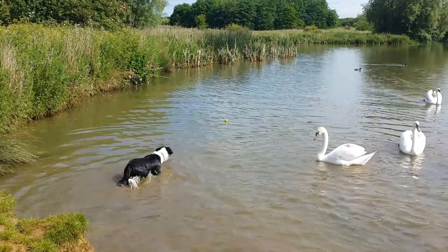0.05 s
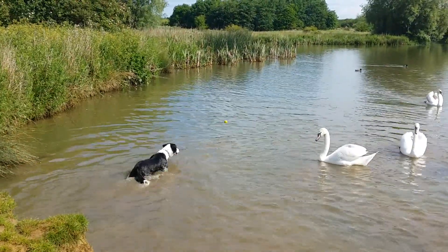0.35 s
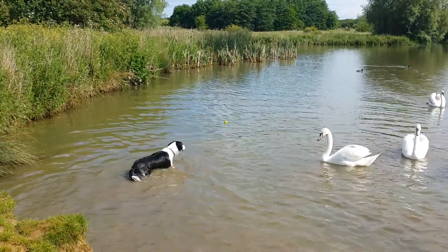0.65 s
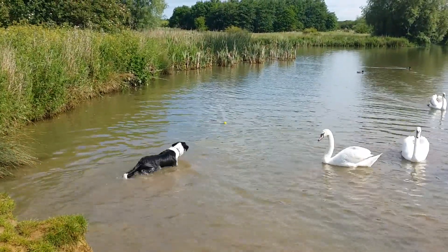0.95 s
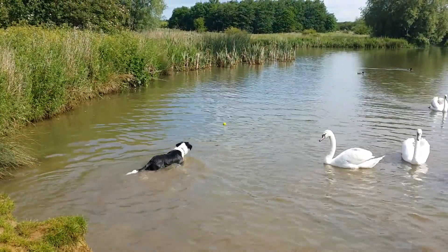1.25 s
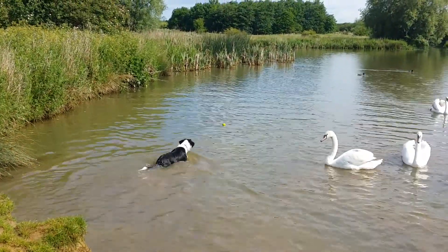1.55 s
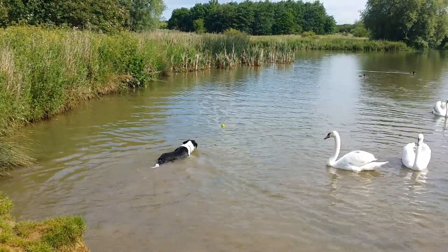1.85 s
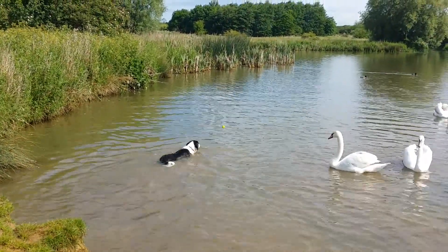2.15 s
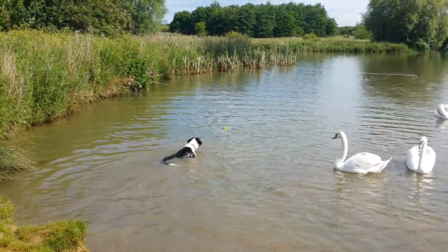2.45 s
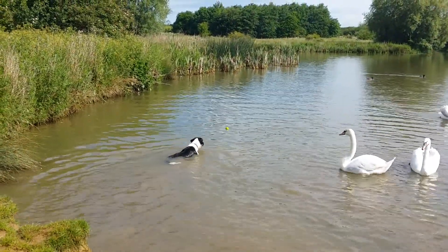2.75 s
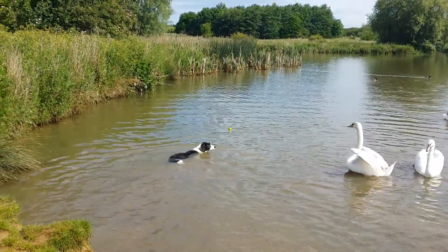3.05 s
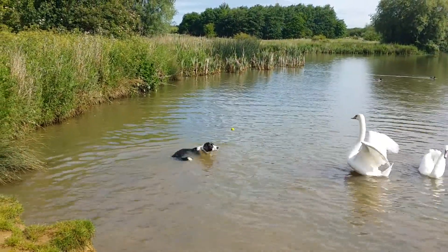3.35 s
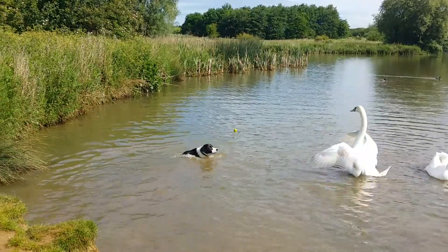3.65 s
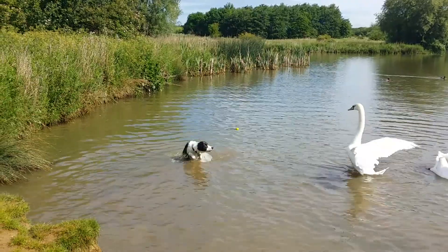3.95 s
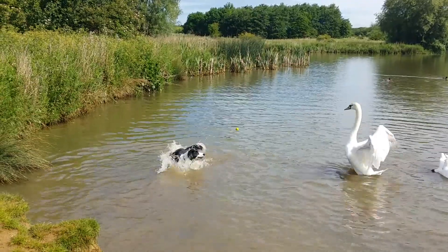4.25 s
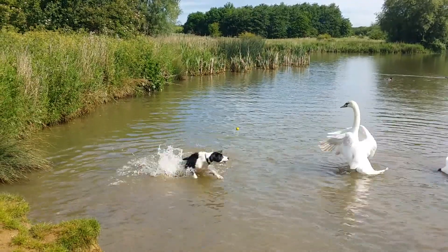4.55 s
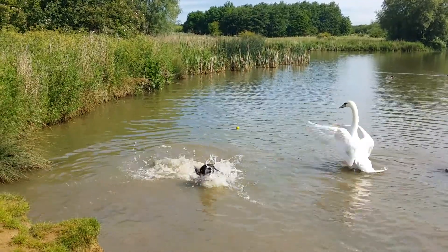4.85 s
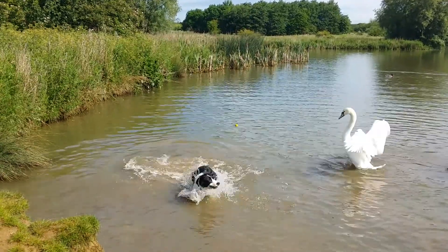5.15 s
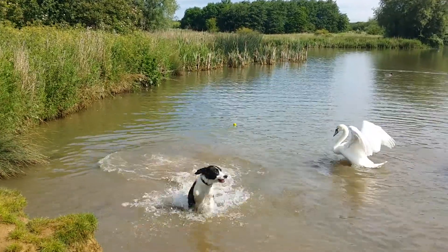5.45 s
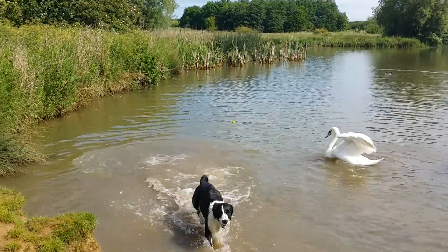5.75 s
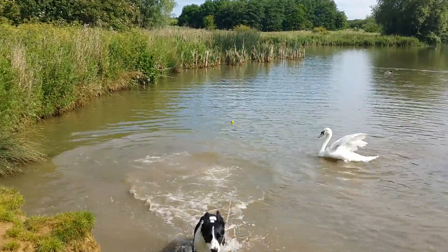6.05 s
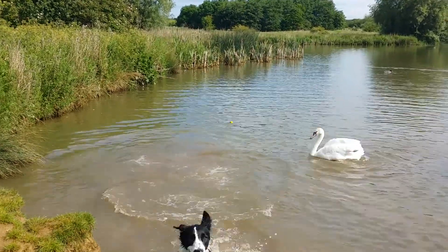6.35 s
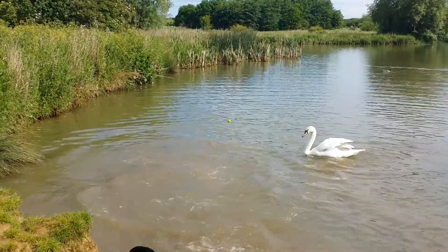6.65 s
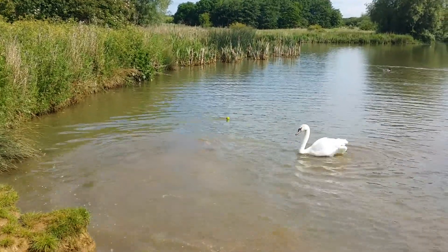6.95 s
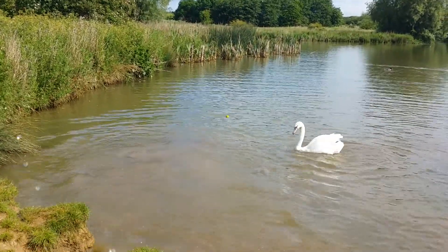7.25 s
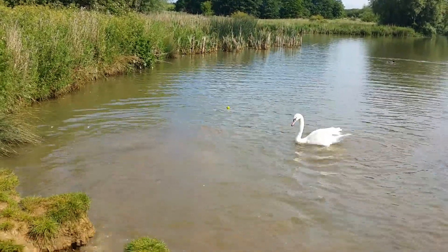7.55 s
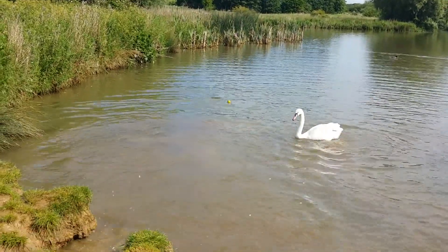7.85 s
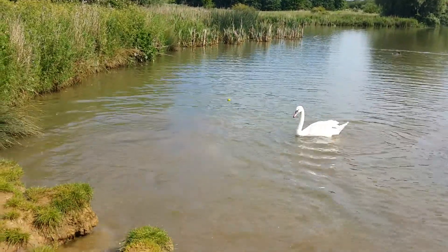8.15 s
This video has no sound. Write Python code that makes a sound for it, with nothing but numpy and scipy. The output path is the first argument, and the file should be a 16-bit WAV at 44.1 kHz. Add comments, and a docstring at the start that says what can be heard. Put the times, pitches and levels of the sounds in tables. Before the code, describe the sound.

A dog wades into a pond with soft sloshes, bubbles and drips, while a warbler trills in the reeds and another bird flutes far off. The dog gives two short woofs and bounds back through the shallows in loud, uneven splashes. Close to the microphone it shakes itself twice, wet ears slapping, drops ticking and its collar tag clinking. Faint country air and light puffs of wind lie underneath.

```python
"""A dog wades into a pond, all slosh, bubbles and drips, while a warbler trills in the reeds and another
bird flutes far off. At 3.5 s the dog woofs, rough pulses through throat and muzzle; it wheels round,
woofs again and bounds back through the shallows, each paw thumping trapped air and throwing spray.
From 6.7 s it shakes itself twice on the bank, close by: wet ears slap, flung drops tick as they land
and the tag on its collar clinks and rings. Country air and puffs of wind lie under it all."""
import sys
import numpy as np
from scipy import signal
from scipy.fft import rfft, irfft, next_fast_len
from scipy.io import wavfile

SR = 44100
rng = np.random.default_rng(int(sys.argv[2]) if len(sys.argv) > 2 else 0)


def wav_out(sig):
    """Save sig, one row per channel (or a flat mono array), as 16-bit PCM at SR to the path in sys.argv[1]."""
    wavfile.write(sys.argv[1], SR, np.round(np.clip(np.atleast_2d(sig).T, -1, 1) * 32767).astype(np.int16))


N = 369999
TIME = np.arange(N) / SR

# Levels in the tables are pre-fader: each layer adds its own gain.
# tone of the far country air: (frequency [Hz], level [dB])
AIR_TONE = [(30, 13), (90, -11), (150, 2), (230, -3.5), (330, -14), (600, -14.5), (1200, -17.5),
            (1900, -16.5), (2350, -9.5), (3100, -14.5), (4600, -24), (8600, -26.5), (14000, -35.5)]
# a thin far hiss in the reeds: (time [s], hold [s], level [dB])
REED_HISSES = [(.45, 0.21, -64.5)]
# puffs of wind on the microphone: (time [s], hold [s], level [dB])
GUSTS = [(0.0, 0.036, -58), (4.28, 0.16, -53.5), (4.95, 0.067, -52.5), (6.1, 0.24, -58),
         (6.52, 0.14, -50.5), (7.15, 0.026, -57), (7.6, .25, -65.5), (8.2, 0.1, -56.5)]
# their rumble: (frequency [Hz], level [dB])
WIND_TONE = [(10, -35), (25, -35), (60, -6), (110, -4.5), (200, -23), (1000, -75)]
# echoes off the reed banks: (delay [s], level [dB])
BANK_ECHOES = [(0.032, -25), (0.076, -25), (.118, -66)]
# the far bird's fluting: (time [s], length [s], start [Hz], middle [Hz], end [Hz], level [dB])
FLUTE_NOTES = [(.635, .05, 2400, 2430, 2200, -66), (.665, .06, 2360, 2580, 2500, -70),
               (.98, 0.045, 2150, 2210, 2350, -70), (1.53, .11, 1850, 1940, 1820, -71),
               (1.66, .08, 1940, 2000, 1950, -69), (1.785, 0.069, 1775, 1820, 1740, -63),
               (1.937, 0.096, 2970, 2520, 2070, -64), (2.078, 0.065, 2070, 2010, 1930, -61),
               (2.36, 0.063, 1755, 1890, 1940, -61), (2.41, .105, 1980, 1850, 1780, -59),
               (2.585, 0.13, 2400, 2230, 2220, -63), (2.77, .08, 2200, 2220, 2240, -71),
               (2.95, .1, 2240, 2210, 2210, -69)]
# the warbler's song:
# (time [s], length [s], start [Hz], middle [Hz], end [Hz], trill [share of pitch], level [dB])
WARBLER_NOTES = [(0.313, 0.035, 3920, 3690, 3620, .01, -56), (1.13, 0.063, 3460, 3480, 3600, .02, -66),
                 (1.866, 0.033, 4070, 4400, 3900, .07, -64), (1.908, 0.063, 5100, 4900, 3900, .02, -62),
                 (2.018, 0.044, 4030, 3850, 3950, 0.12, -52.5), (2.054, 0.04, 4000, 3750, 3350, .001, -48),
                 (2.158, 0.033, 5120, 5020, 4500, 0.013, -47),
                 (2.184, .034, 5160, 4930, 4630, 0.085, -51.5),
                 (2.256, 0.049, 3240, 3700, 3770, 0.026, -51.5),
                 (2.363, 0.062, 5130, 4650, 4230, 0.18, -53), (2.476, 0.02, 3350, 4050, 4660, .02, -51.5),
                 (2.489, 0.057, 3780, 3790, 3680, 0.15, -52.5),
                 (2.587, 0.034, 5600, 5750, 5400, .01, -59.5),
                 (2.612, 0.054, 5170, 4620, 5070, 0.19, -55.5), (2.703, 0.08, 4400, 4240, 3700, 0.046, -63),
                 (2.713, 0.049, 2360, 2700, 3340, .02, -51.5), (2.772, 0.036, 3390, 3350, 3480, 0.077, -54),
                 (2.85, 0.033, 5450, 5020, 4120, 0.058, -55.5),
                 (2.895, 0.034, 5030, 5620, 5600, 0.069, -56.5),
                 (2.969, 0.067, 5100, 4520, 3250, 0.019, -55), (3.055, 0.036, 3040, 3050, 3900, .01, -61),
                 (3.047, 0.058, 4870, 4750, 4550, 0.066, -62), (3.184, 0.023, 3630, 3230, 3120, 0.11, -54),
                 (3.235, 0.029, 3830, 5020, 5530, 0.1, -52), (3.359, .035, 2730, 2980, 3150, .03, -62),
                 (7.932, 0.065, 4350, 4050, 3630, .005, -58), (8.07, 0.051, 6000, 5650, 6100, 0.013, -54)]

# borders of the four water bands, slosh, splash, spray and mist: (frequency [Hz])
WASH_EDGES_HZ = [130, 600, 2200, 6500, 15500]
# tone of stirred water: (frequency [Hz], level [dB])
WATER_TONE = [(100, 5.5), (200, 4.5), (320, 1), (550, 0.5), (850, -6), (1400, -2), (2000, -6.5),
              (2600, -3.5), (3200, -11.5), (4200, -12), (6000, -13.5), (8400, -16), (11000, -20),
              (14500, -32)]
# slow strides that stir the pond: (time [s], hold [s], level [dB])
STRIDES = [(0.0, 0.013, -46), (0.2, 0.026, -48), (1.06, 0.27, -65.5), (1.74, 0.13, -72)]
# bounding ashore, the slosh thins in the shallows: (time [s], slosh [dB], splash [dB], spray [dB])
CHURN = [(3.4, -81, -79, -66), (3.49, -60, -58, -52.5), (3.7, -54, -51.5, -53.5), (3.86, -56, -48, -50),
         (4.02, -50, -39.5, -46), (4.1, -41.5, -36, -43), (4.35, -38, -40.5, -42.5),
         (4.44, -38, -37, -36.5), (4.62, -41, -35.5, -36.5), (4.75, -36.5, -37, -37.5),
         (4.96, -37, -36, -38), (5.36, -40, -37, -35), (5.54, -37, -40.5, -39), (5.8, -47.5, -41.5, -35.5),
         (6.02, -43.5, -41, -39), (6.25, -49, -38.5, -34), (6.44, -52, -42, -38), (6.75, -55, -47, -42)]
# each shake flings a cloud of fine drops: (time [s], hold [s], level [dB])
SHAKES = [(6.75, 0.96, -44.5), (7.95, 0.79, -49.5)]
# band balance of each move: (slosh [dB], splash [dB], spray [dB], mist [dB])
WADING_EQ = [-1, 0, -4, -5]
CHURN_EQ = [-0.04, -0.33, 0.74, -1.5]
SHAKE_EQ = [-9, -7.5, 0, 2.5]
# lone drips off the dog: (time [s], bubble level [dB], bubble pitch [Hz], tick level [dB], tick [Hz])
DRIPS = [(0.448, -38, 1230, -36, 1300), (0.594, -43.5, 781, -47, 2010), (0.607, -54, 2300, -38.5, 4530),
         (0.676, -40, 1670, -40, 5030), (0.855, -48, 895, -39.5, 1800), (1.023, -47, 1190, -58, 2500),
         (1.058, -38, 1820, -46, 1800), (1.088, -44, 637, -53, 3500), (1.119, -47, 654, -38, 4800),
         (1.166, -43, 940, -41, 1200), (1.28, -52, 900, -46, 5200), (1.301, -45, 1840, -41, 1200),
         (1.396, -48, 660, -42, 1600), (1.409, -49, 564, -44, 1500), (1.476, -47, 860, -59, 1800),
         (1.758, -32, 3120, -32, 2750), (3.439, -43, 1780, -33.5, 8800), (3.53, -24, 5000, -40, 4500),
         (3.539, -18, 2620, -42, 4200), (3.565, -29, 8200, -42, 3400), (3.571, -21, 4900, -34, 4300),
         (3.621, -34, 1800, -30, 1490), (3.643, -36, 5100, -33, 4000), (3.792, -37, 4420, -29, 4400),
         (3.815, -34, 3300, -47, 3700), (3.883, -27, 4800, -32, 4030)]
# single air pockets: (time [s], length [s], start pitch [Hz], level [dB])
PLOPS = [(0.002, 0.024, 800, -46), (0.013, 0.04, 490, -47.5), (0.124, 0.03, 653, -47),
         (0.128, 0.012, 1150, -39), (0.136, 0.012, 357, -47), (0.171, 0.0063, 1720, -39),
         (0.212, 0.011, 730, -34), (0.234, 0.023, 900, -43), (0.259, 0.017, 1055, -41),
         (0.284, 0.0073, 1670, -32.5), (0.378, 0.014, 1117, -41.5), (1.02, 0.044, 1017, -57),
         (1.088, 0.034, 523, -56), (1.14, .022, 520, -57), (1.243, .016, 650, -59), (1.3, 0.011, 1590, -62),
         (1.345, .016, 960, -61), (1.378, .014, 1130, -56.5), (1.405, 0.016, 600, -58.5),
         (1.474, 0.018, 745, -60), (1.761, 0.0097, 1320, -58), (3.451, .024, 634, -45),
         (3.655, 0.011, 1550, -41.5), (4.785, 0.06, 280, -41), (5.006, 0.02, 183, -31),
         (5.192, 0.016, 330, -46), (5.329, 0.027, 326, -39), (5.346, 0.023, 796, -35.5),
         (5.664, 0.039, 371, -37), (5.672, 0.05, 757, -43), (5.733, 0.013, 1496, -34),
         (5.848, 0.03, 447, -31), (5.867, .016, 715, -40), (5.872, 0.016, 1335, -33),
         (6.005, 0.049, 251, -33.5), (6.038, 0.039, 420, -32.5), (6.065, 0.0081, 1940, -32),
         (6.29, 0.026, 554, -36), (6.316, 0.021, 1175, -37), (6.968, 0.052, 637, -44),
         (7.439, 0.017, 1090, -41), (7.527, 0.035, 1290, -46), (7.673, 0.033, 642, -42),
         (7.88, 0.028, 1490, -53.5)]
# paws and chest hitting water: (time [s], swell [s], fall [s], cavity [Hz], cavity [dB], spray [dB])
PAW_SPLASHES = [(0.058, 0.0021, 0.005, 800, -46, -37), (0.117, 0.016, 0.024, 410, -36.5, -47),
                (0.172, 0.017, 0.013, 780, -36.5, -45.5), (0.228, .015, 0.027, 1000, -43, -50),
                (0.258, 0.016, 0.016, 1150, -40.5, -46), (0.28, 0.01, 0.0078, 644, -67, -46.5),
                (0.379, 0.002, 0.0049, 620, -48, -38.5), (1.056, 0.0022, 0.0071, 240, -54, -53),
                (1.08, 0.0029, 0.0088, 400, -59, -51), (1.738, 0.003, 0.014, 2200, -57, -56),
                (3.437, 0.0074, 0.0042, 190, -78, -54), (3.47, 0.026, 0.063, 186, -38.5, -82),
                (3.555, 0.014, 0.046, 380, -49, -43), (3.95, 0.011, 0.018, 212, -35.5, -47),
                (4.062, 0.0091, .025, 1000, -48, -34.5), (4.096, 0.0026, 0.0049, 887, -30, -26),
                (4.116, .008, .018, 800, -33.5, -43), (4.186, 0.0057, 0.0046, 1210, -31, -19.5),
                (4.233, 0.012, 0.024, 648, -33, -58), (4.46, .01, 0.038, 323, -37, -42),
                (4.56, 0.013, 0.026, 900, -49, -33), (4.581, 0.0012, 0.0038, 1460, -47, -20),
                (4.62, .004, 0.03, 1100, -38, -29.5), (4.69, 0.013, 0.078, 620, -35, -61),
                (4.81, 0.003, 0.012, 407, -31.5, -49), (5.0, 0.0026, 0.022, 213, -32.5, -33),
                (5.052, .003, 0.0093, 1090, -37, -30), (5.12, 0.013, 0.028, 313, -33.5, -64),
                (5.172, 0.0079, 0.008, 503, -31, -39), (5.24, 0.0046, 0.016, 306, -30.5, -63),
                (5.32, 0.02, 0.014, 350, -29, -42), (5.553, 0.00056, 0.0029, 798, -36, -24),
                (5.67, 0.0148, .025, 695, -34, -46), (5.73, 0.0085, 0.0057, 1410, -38, -26),
                (5.829, 0.0025, 0.0029, 1520, -33, -26), (5.852, 0.039, 0.0079, 477, -33, -28.5),
                (5.881, .002, 0.004, 1390, -32, -24), (5.952, 0.014, 0.021, 403, -33, -41),
                (6.061, 0.0042, 0.022, 700, -42, -28), (6.165, 0.00085, 0.0035, 875, -28.5, -21.5),
                (6.29, 0.032, 0.031, 714, -44, -27), (6.49, 0.047, 0.11, 790, -43.5, -32.5),
                (6.666, 0.0017, 0.0077, 367, -44.5, -29)]
# wet ears slapping and flung drops ticking as they land:
# (time [s], swell [s], fall [s], cavity [Hz], cavity [dB], spray [dB])
SHAKE_HITS = [(6.71, 0.0022, 0.0044, 1100, -39.5, -19.5), (6.759, 0.0075, 0.0031, 835, -32, -27.5),
              (6.772, 0.0008, 0.0024, 1290, -21.5, -48), (6.842, 0.0048, 0.0091, 385, -35, -29),
              (6.863, 0.0006, 0.0028, 1240, -30.5, -40), (6.936, 0.0071, 0.0083, 228, -36, -28),
              (7.033, 0.014, 0.016, 474, -34.5, -26.5), (7.105, 0.0014, 0.0022, 2000, -55, -30),
              (7.118, 0.0074, 0.0045, 820, -26.5, -22.5), (7.167, 0.0028, 0.024, 656, -42, -41),
              (7.188, 0.00205, 0.0067, 1800, -59, -31), (7.207, 0.0059, 0.0095, 290, -31, -34.5),
              (7.307, 0.00067, 0.011, 1380, -37, -31.5), (7.34, 0.0021, 0.0062, 900, -63, -34.5),
              (7.388, 0.0008, 0.013, 329, -33.5, -36), (7.477, 0.0027, 0.017, 385, -35, -34.5),
              (7.525, 0.00074, 0.0011, 300, -53, -28), (7.578, 0.0011, 0.0035, 1900, -47, -38),
              (7.72, 0.0014, 0.0057, 1310, -52, -34), (7.78, 0.0025, 0.0069, 2500, -52, -38),
              (7.86, .001, .003, 2190, -52, -38.5), (8.022, 0.00044, 0.0076, 670, -34, -48),
              (8.105, 0.0027, 0.015, 680, -38.5, -54), (8.12, 0.0012, 0.0036, 900, -47, -48),
              (8.196, 0.0013, 0.0065, 704, -33, -38.5), (8.265, 0.0012, 0.0027, 2500, -49, -46),
              (8.291, 0.0012, 0.023, 640, -39, -42), (8.331, .001, 0.0038, 2620, -45, -40),
              (8.384, 0.0014, 0.0075, 695, -37, -43)]
# tone of the spray from the paws and from the shake: (frequency [Hz], level [dB])
PAW_SPRAY = [(2300, 14.3), (4200, 6.2), (8000, 5.2), (14000, 2.1)]
SHAKE_SPRAY = [(2300, 2.9), (5000, 5.8), (8000, 7.7), (14000, 2.3)]

# collar hits: (time [s], swell [s], favoured pitch [Hz], clash [dB], tag ring [dB],
# share of the tag's upper twin mode [0-1], right over left [dB])
CLINKS = [(3.761, .0023, 6500, -44, -39, 0.37, 0), (4.978, 0.0051, 6500, -27, -31, 0.3, 0),
          (5.448, 0.012, 6500, -33.5, -37, .05, 0), (6.179, .0025, 5200, -30, -38, 0.2, 2),
          (6.869, 0.00078, 5170, -16, -37, .3, -4), (6.8837, 0.00048, 3850, -9.5, -28, 0.3, -1.5),
          (6.99, .008, 6460, -45, -35, .7, -1), (7.038, 0.0021, 5930, -24, -29, 0.3, -2),
          (7.064, 0.0084, 5340, -15.5, -40, .4, 2.5), (7.23, 0.0013, 7500, -17.5, -40, .3, 3),
          (7.241, 0.0016, 4830, -15, -17.5, 0, 4.5), (7.409, 0.00087, 7000, -19.5, -48, .5, 5),
          (7.423, 0.0085, 8200, -15, -28, .5, 2), (7.591, 0.002, 6200, -25, -42, .6, 3),
          (7.602, .001, 6400, -12.5, -32, 1, 4), (7.614, .00076, 8400, -24, -18, 0.93, 2),
          (8.01, 0.0043, 6500, -31, -27.5, .9, 11), (8.156, 0.004, 8600, -39, -36, .8, 8),
          (8.227, 0.0072, 8700, -47, -38, .8, 3), (8.249, .008, 6500, -53, -42, .8, 8),
          (8.329, 0.0049, 6470, -35, -36.5, .8, 11)]
# modes of buckle and ring: (frequency [Hz], width [Hz], level [dB])
BUCKLE_MODES = [(2480, 89, 31.5), (3420, 180, 22), (3990, 160, 24), (4730, 160, 19), (5200, 500, 21.5),
                (5950, 290, 26), (6480, 190, 35.5), (7630, 360, 21), (8340, 190, 22), (11180, 920, -9)]
# modes of the hanging tag, the first two a close twin: (frequency [Hz], level [dB], t60 [s])
TAG_MODES = [(6485, 0, .075), (6545, 0, .075), (3700, -23, .12), (8680, -17, .1), (10750, -30, .1),
             (14480, -23, .07)]
# two woofs: (time [s], lead-in growl [s], hold [s], top pitch [Hz], level [dB], mouth opening [0-1],
# roughness [0-1])
WOOFS = [(3.516, .062, 0.0222, 390.8, -16.5, 0.96, 0.09), (4.367, .004, 0.026, 297, -25, 0.47, 0.63)]
# tone of the throat, mouth wide open: (frequency [Hz], level [dB])
THROAT_TONE = [(120, -14), (230, 12.5), (400, 8.5), (600, 4.5), (800, 10.5), (1030, 2.5), (1250, 2),
               (1500, -9), (2200, -25), (5000, -14.5), (9000, -25.5)]

# stereo image, wider in the treble: (frequency [Hz], left-right likeness [0-1])
LIKENESS = [(60, 0.48), (150, 1), (380, 0.9), (950, 0.83), (1800, 0.7), (2600, 0.37), (4300, 0.36),
            (6000, 0.38), (9000, 0.061), (15000, 0.022)]
# head-on, the microphone ports ring near 2 kHz and hollow out just above: (frequency [Hz], gain [dB])
PORT_EQ = [(370, 1), (520, -3), (770, 2), (1030, -1.5), (1220, 1.5), (1500, -3.5), (1680, -1), (1880, 4),
           (2050, 1.5), (2280, -6), (2620, -10), (2950, -5), (3600, 1.5), (5000, 1.8), (6100, -1),
           (7400, -1), (8500, 2.5), (9400, -1), (10500, 1), (15000, 1)]
# microphone balance: (frequency [Hz], right over left [dB])
RIGHT_LEAD = [(40, 3), (130, 3.5), (700, 3.5), (2400, 4.5), (4400, 4.5), (6300, -0.5), (8500, 8.5),
              (11500, 6.5), (14500, 1)]


def from_db(db):
    """Decibels to gain."""
    return 10 ** (np.asarray(db) / 20)


def rms_one(x):
    """Scale to unit power."""
    return x / np.sqrt(np.mean(x ** 2) + 1e-20)


def at_level(x, db, length):
    """Give a one-shot the energy of a level held for a length in seconds."""
    return from_db(db) * rms_one(x) * np.sqrt(max(length, 1e-3) * SR / x.shape[-1])


def at_hz(points, hz):
    """Read a curve on a log-frequency axis."""
    f, value = np.transpose(points)
    return np.interp(np.log(np.maximum(hz, 1)), np.log(f), value)


def band(x, low_hz, high_hz, order=2):
    """Causal band-pass."""
    sos = signal.butter(order, [low_hz, min(high_hz, .45 * SR)], "band", fs=SR, output="sos")
    return signal.sosfilt(sos, x + 1e-18)


def eq(x, curve):
    """Shape a sound with a smooth EQ curve."""
    size = next_fast_len(x.shape[-1] + 512)
    gain = from_db(at_hz(curve, np.arange(size // 2 + 1) * SR / size))
    return irfft(rfft(x, size) * gain, size)[..., :x.shape[-1]]


def drift(rate, size=N):
    """Random modulator swinging about 1 either way, with `rate` new values a second."""
    return np.interp(np.arange(size) * rate / SR, np.arange(4096), rng.standard_normal(4096))


def stereo(three, hz):
    """Blend one shared and two private signals to the stereo width at hz."""
    alike = np.clip(at_hz(LIKENESS, hz), 0, 1)
    return np.sqrt(alike) * three[0] + np.sqrt(1 - alike) * three[1:]


def add(out, s, sound):
    """Mix a sound in at time s."""
    at = max(0, round(s * SR))
    out[:, at:at + sound.shape[-1]] += sound[..., :max(0, N - at)]


def phase_of(hz):
    """Running phase of a moving pitch."""
    return 2 * np.pi * np.cumsum(hz) / SR


def arch(pitches, u):
    """Glide through a start, middle and end pitch as u runs from 0 to 1."""
    return np.polyval(np.polyfit([0, .5, 1], pitches, 2), u)


def swells(rows, attack_s, fall_db_per_s):
    """Envelope of events that rise until their time, hold, then die away."""
    power = 1e-12
    for s, hold, db in rows:
        rise = np.clip(1 + (TIME - s) / attack_s, 0, 1)
        power = power + (rise * from_db(db - fall_db_per_s * np.maximum(TIME - s - hold, 0))) ** 2
    return np.sqrt(power)


def grains(per_s, spread_db, size=N):
    """Three trains of random clicks, many small and a few large."""
    most = size // 4
    where = rng.integers(0, 3 * size, most)
    sounding = rng.random(most) < 3 * per_s * size / SR / most
    sizes = from_db(spread_db * np.minimum(rng.exponential(1, most), 4.5)) * rng.choice([-1, 1], most)
    return rms_one(np.bincount(where, sizes * sounding, 3 * size).reshape(3, size))


def burst(swell, fall, fall_db, tail_db, tail_s, per_s):
    """A clump of clicks that swells, collapses and leaves a faint patter."""
    t = TIME[:SR // 8]
    after = np.maximum(t - swell, 0)
    attack = np.minimum((t + 1 / SR) / max(swell, 1 / SR), 1) ** 0.49
    decay = from_db(-fall_db * after / max(fall, 1e-3)) + from_db(tail_db) * np.exp(-after / tail_s)
    return grains(per_s, spread_db=4, size=len(t)) * attack * decay


def open_air(air_db, wind_db, drone_hz, drone_db):
    """The bed: far rumble and leaves, a low drone, a thin reed hiss and wind on the microphone."""
    white = rng.standard_normal((3, N))
    rumble = band(stereo(white, 122), 124, 436)
    leaves = band(stereo(rng.standard_normal((3, N)), 16000), 340, 24000)
    air = from_db(air_db) * rms_one(eq(rumble + leaves, AIR_TONE))
    drone = from_db(drone_db) * rms_one(band(white[0], drone_hz - 7, drone_hz + 7))
    hiss = swells(REED_HISSES, attack_s=.6, fall_db_per_s=75) * rms_one(band(white[1:], 7400, 8400))
    gusts, breeze = swells(GUSTS, attack_s=0.17, fall_db_per_s=38), from_db(-67.5)
    buffeting = rms_one(eq(stereo(rng.standard_normal((3, N)), 1450), WIND_TONE))
    return air + drone + hiss + from_db(wind_db) * np.hypot(gusts, breeze) * buffeting


def bank_echoes(x):
    """The reed banks throw back a few dull slap echoes."""
    out, dull = np.zeros((2, N)), band(x, 200, 3200, order=1)
    for delay, db in BANK_ECHOES:
        add(out, delay, from_db(db) * dull)
    return out


def far_bird(level_db, waver, echo_s, echo_db):
    """Slow pure glides from across the pond, with one echo off the trees."""
    out = np.zeros((2, N))
    for s, length, *pitches, db in FLUTE_NOTES:
        u = np.linspace(0, 1, int(length * SR))
        hz = arch(pitches, u) * (1 + waver * drift(140, len(u)))
        envelope = from_db(db + level_db) * np.sqrt(np.abs(np.sin(np.pi * u)))
        note = envelope * np.sin(phase_of(hz) + rng.normal(0, 0.52, (2, 1)))
        add(out, s, note)
        add(out, s + echo_s, from_db(echo_db) * note)
    return out


def warbler(level_db, trill_hz, waver, scatter_t60):
    """Arched whistles, some with a fast trill, smeared by returns from many reed stems."""
    out, t = np.zeros((2, N)), TIME[:SR // 2]
    for s, length, *pitches, trill, db in WARBLER_NOTES:
        u = np.linspace(0, 1, int(length * SR))
        beat = phase_of(trill_hz * (1 + .4 * drift(200, len(u))))
        warble = trill * (.7 * np.sin(beat) + .35 * drift(220, len(u)))
        hz = arch(pitches, u) * (1 + warble + waver * drift(300, len(u)))
        pulsing = rms_one(1 - min(trill * 8, .9) * np.cos(beat))   # loudest on the downstrokes
        envelope = from_db(db + level_db + 2 * drift(184, len(u))) * np.sqrt(np.abs(np.sin(np.pi * u)))
        add(out, s, envelope * pulsing * np.sin(phase_of(hz)))
    scatter = rms_one(rng.standard_normal((2, len(t))) * from_db(-60 * t / scatter_t60))
    return out + signal.fftconvolve(out, scatter / np.sqrt(len(t)), axes=1)[:, :N]


def stirring():
    """Fader rides in dB for slosh, splash, spray and mist as the dog wades, bounds and shakes."""
    strides, ripple = swells(STRIDES, attack_s=0.09, fall_db_per_s=52), from_db(-70.5)
    shaking = swells(SHAKES, attack_s=0.027, fall_db_per_s=33)
    times, *levels = np.transpose(CHURN)
    slosh, splash, spray = [np.interp(TIME, times, db) for db in levels]
    outside_s = np.abs(TIME - np.clip(TIME, times[0], times[-1]))
    bounding = from_db(np.array([slosh, splash, spray, spray]) - 143 * outside_s)   # 143 dB/s fades
    moves = (np.hypot(strides, ripple), WADING_EQ), (bounding, CHURN_EQ), (shaking, SHAKE_EQ)
    return 10 * np.log10(sum((gain * from_db(balance)[:, None]) ** 2 for gain, balance in moves))


def wash(stirred_db, drops_per_s, spread_db, hiss_db, patchy_db, surge_db, trim_db):
    """Drops of every size ring briefly over a smooth hiss; the slosh surges, the spray patters on."""
    out, surge = np.zeros((2, N)), drift(60)
    hiss = from_db(hiss_db) * rng.standard_normal((2, 3, N))
    for i, level_db in enumerate(stirred_db):
        edges, layer = np.geomspace(WASH_EDGES_HZ[i], WASH_EDGES_HZ[i + 1], 7), 0
        for k in range(6):
            hz = np.sqrt(edges[k] * edges[k + 1])
            drops = grains(drops_per_s[i], spread_db[i]) + hiss[k % 2]
            gain = from_db(at_hz(WATER_TONE, hz) + patchy_db[i] * drift(35) + surge_db[i] * surge)
            layer = layer + band(stereo(drops, hz) * gain, edges[k], edges[k + 1])
        out += from_db(level_db + trim_db[i]) * rms_one(layer)
    return out


def bubble(hz, cycles, rise):
    """One bubble: a dying note that chirps upwards."""
    life = cycles / hz
    t = TIME[:int(2 * life * SR)]
    return np.sin(2 * np.pi * hz * t * (1 + rise * t / life)) * np.exp(-3 * t / life)


def bubbles(water_db, level_db, low_hz, high_hz, cycles, rise, ceiling_db, count):
    """Bubbles ring as they near the surface; they get only so loud, so hard churning drowns them."""
    out = np.zeros((2, N))
    for when, pitch, size, side in rng.random((count, 4)):
        db = min(water_db[int(when * N)] + level_db, ceiling_db) + 14 * (size ** 2 - 1)
        pan_db = (side - 0.5) * np.array([[3], [-3]])
        note = bubble(low_hz * (high_hz / low_hz) ** pitch, cycles, rise)
        add(out, when * N / SR, from_db(db + pan_db) * note)
    return out


def drips(level_db, cycles, tick_s):
    """A drop ticks on the surface and leaves one short bubble."""
    out, t = np.zeros((2, N)), TIME[:SR // 16]
    for s, db, hz, tick_db, tick_hz in DRIPS:
        noise = stereo(rng.standard_normal((3, len(t))), tick_hz)
        tick = rms_one(band(noise, tick_hz / np.sqrt(2), tick_hz * np.sqrt(2), order=1))
        add(out, s, from_db(tick_db + level_db) * tick * np.exp(-t / tick_s))
        add(out, s, from_db(db + level_db) * bubble(hz, cycles, rise=0.014))
    return out


def plops(level_db, octaves_per_s):
    """An air pocket closes behind a paw or a big drop; its note glides up as it nears the surface."""
    out = np.zeros((2, N))
    for s, length, start_hz, db in PLOPS:
        u = np.linspace(0, 1, int(length * SR))
        hz = start_hz * 2 ** (octaves_per_s * length * u) * (1 + .12 * drift(400, len(u)))
        envelope = from_db(db + level_db + 2 * drift(190, len(u))) * np.sin(np.pi * u ** 0.72)
        add(out, s, envelope * np.sin(phase_of(hz)))
    return out


def surface_bounce(x, share):
    """The surface below returns a copy within a millisecond, so each hit has its own colour."""
    lag = int(rng.uniform(0.00018, .001) * SR)
    return x + share * np.pad(x, ((0, 0), (lag, 0)))[:, :-lag]


def wet_hits(rows, cavity_width, spray_tone, fall_db, tail_db, tail_s, crack_share, bounce,
             note_db, note_cycles, trim_db):
    """A wet hit in three layers: trapped air thumps and rings, the surface cracks, droplets spit."""
    out = np.zeros((2, N))
    for s, swell, fall, hz, cavity_db, spray_db in rows:
        hit = surface_bounce(burst(swell, fall, fall_db, tail_db, tail_s, per_s=5000), bounce)
        cavity = band(stereo(hit, hz), hz / (1 + cavity_width), hz * (1 + cavity_width))
        crack = band(stereo(hit, 1370), 1110, 3010, order=3)
        spit = eq(band(stereo(hit, 8900), 2470, 10300), spray_tone)
        crack_db = spray_db + crack_share * (cavity_db - spray_db)
        for part, db in zip((cavity, crack, spit), np.add((cavity_db, crack_db, spray_db), trim_db)):
            add(out, s, at_level(part, db, swell + fall))
        note = bubble(hz, note_cycles, rise=0.083)
        add(out, s + swell / 2, at_level(note, cavity_db + note_db, min(swell + fall, note_cycles / hz)))
    return out


def squelch(level_db, spread_s, low_hz, high_hz, cycles, count=9):
    """A few small bubbles trail each ear slap or landing drop; the later ones are weaker."""
    out = np.zeros((2, N))
    for s, swell, *_, spray_db in SHAKE_HITS:
        for late, pitch, side in rng.random((count, 3)):
            db = spray_db + level_db - 12 * late + (side - .5) * np.array([[5], [-5]])
            note = bubble(low_hz * (high_hz / low_hz) ** pitch, cycles, rise=0.12)
            add(out, s + swell + spread_s * late ** 2, from_db(db) * note)
    return out


def collar(clash_db, raw_db, fall_s, favour_db, favour_octaves):
    """Metal chatters on metal, then the tag rings on; the collar swings from side to side."""
    out, t = np.zeros((2, N)), TIME[:SR // 8]
    for s, swell, favoured_hz, db, tag_db, upper, pan_db in CLINKS:
        pan = from_db(pan_db * np.array([[-.5], [.5]]))
        hit = stereo(burst(swell, fall_s, fall_db=14, tail_db=-24, tail_s=0.012, per_s=4200), 7000)
        clash = from_db(raw_db) * band(hit, 2700, 7200)
        for hz, width, mode_db in BUCKLE_MODES:   # each contact lifts the modes near one pitch
            lift_db = favour_db * np.exp(-(np.log2(hz / favoured_hz) / favour_octaves) ** 2)
            mode = band(hit, hz - width / 2, hz + width / 2, order=1)
            clash += from_db(mode_db + lift_db + 2 * rng.standard_normal()) * mode
        add(out, s, pan * at_level(clash, db + clash_db, swell + fall_s))
        shares = np.ones(len(TAG_MODES))
        shares[:2] = 1 - upper, upper
        attack = np.minimum(t / max(swell, 1e-3), 1)
        for (hz, mode_db, t60), share in zip(TAG_MODES, shares):
            phase = 2 * np.pi * (hz * (1 + rng.normal(0, .002)) * t + rng.random())
            ring = np.sin(phase + rng.normal(0, .7, (2, 1)))
            decay = from_db(tag_db + mode_db - 60 * np.maximum(t - swell, 0) / t60)
            add(out, s, pan * share * attack * decay * ring)
    return out


def woof_controls(lead, hold, top_hz, top_db, opening, roughness):
    """Effort builds in a growl, jumps, holds and lets go; the mouth snaps open, then eases shut."""
    attack_s, release_s, edge_s, pitch_lag_s = 0.0128, 0.037, 0.0049, 0.00722
    growl_hz, growl_below_db, growl_rough = 214.8, 25, 0.45   # the voice at no effort
    ajar, close_s = 0.22, 0.085
    end = attack_s + hold + release_s
    t = np.arange(-lead, end, 1 / SR)
    effort = np.interp(t, [-lead, 0, attack_s, attack_s + hold, end], [0, .56, 1, 1, 0])
    pitch = growl_hz + (top_hz - growl_hz) * np.interp(t - pitch_lag_s, t, effort) ** 1.5
    fades = np.clip(np.minimum(t + lead, end - t) / edge_s, 1e-3, 1)
    db = top_db - growl_below_db * (1 - effort) + 20 * np.log10(fades)
    snap = np.clip(t / attack_s * 2, 0, 1) * np.exp(-np.maximum(t - attack_s, 0) / close_s)
    mouth = np.clip(ajar + (opening - ajar) * snap, 0, 1)
    rough = growl_rough + (roughness - growl_rough) * effort
    return t, pitch, db, mouth, rough


def woofs(level_db, closed_db, jitter, rasp_db, bark_hz, bark_width_hz, bark_db):
    """Uneven vocal pulses through the throat; an open mouth resonates, a closed muzzle muffles."""
    out, partials = np.zeros((2, N)), np.arange(1, 13)[:, None]
    for s, *shape in WOOFS:
        t, pitch, db, mouth, rough = woof_controls(*shape)
        phase = phase_of(pitch * (1 + jitter * rough * drift(498, len(t))))
        hz = partials * pitch
        muffled = closed_db * (1 - mouth) * np.clip(np.log2(hz / 400), 0, 1)
        bark = bark_db * mouth ** 4 * np.exp(-((hz - bark_hz) / bark_width_hz) ** 2)
        gains = from_db(at_hz(THROAT_TONE, hz) + muffled + bark)
        voice = np.sqrt(2) * np.sum(gains * np.sin(partials * phase), axis=0)
        voice /= np.linalg.norm(gains, axis=0)
        rasp = rms_one(eq(rng.standard_normal(len(t)) * (1 + np.cos(phase)), THROAT_TONE))
        add(out, s + t[0], from_db(db + level_db) * (voice + from_db(rasp_db) * rough * mouth * rasp))
    return out


def scene():
    """The mix: water, dog and birds in the open air, with the shake close below the microphone."""
    stirred_db = stirring()
    slosh_db, splash_db, spray_db, _ = stirred_db
    water = wash(stirred_db, drops_per_s=[221.4, 303.4, 598, 893], spread_db=[3, 3.2, 3.3, 3.6],
                 hiss_db=-9, patchy_db=[2.8, 3, 2.8, 2.3], surge_db=[2.6, 0.78, 0.93, 0.62],
                 trim_db=[-1.3, -1.63, -0.13, -0.37])
    water += bubbles(slosh_db, level_db=7, low_hz=212, high_hz=478, cycles=8.8, rise=0.098,
                     ceiling_db=-23, count=700)   # gurgling
    water += bubbles(splash_db, level_db=10.5, low_hz=593, high_hz=2220, cycles=9.3, rise=0.075,
                     ceiling_db=-26, count=1100)   # babbling
    water += bubbles(spray_db, level_db=9, low_hz=3210, high_hz=9240, cycles=16.5, rise=0.033,
                     ceiling_db=-25, count=1800)   # droplets falling back
    water += plops(level_db=5, octaves_per_s=17.3) + drips(level_db=-7, cycles=27, tick_s=0.0034)
    water += wet_hits(PAW_SPLASHES, cavity_width=0.59, spray_tone=PAW_SPRAY, fall_db=9, tail_db=-16,
                      tail_s=0.089, crack_share=0.48, bounce=0.72, note_db=-6, note_cycles=9.3,
                      trim_db=[-.8, -1.5, 0.2])
    water[1] = np.interp(TIME - 45e-6, TIME, water[1])   # reaches the right microphone a touch later
    shake = wet_hits(SHAKE_HITS, cavity_width=1.0, spray_tone=SHAKE_SPRAY, fall_db=13.5, tail_db=-45,
                     tail_s=0.015, crack_share=0.45, bounce=0.26, note_db=-3.5, note_cycles=4.5,
                     trim_db=[-2.5, -1, -0.5])
    shake += squelch(level_db=-8.5, spread_s=0.038, low_hz=1134, high_hz=4970, cycles=10.7)
    shake += collar(clash_db=-3.5, raw_db=4, fall_s=0.0057, favour_db=18, favour_octaves=0.23)
    pond = water + woofs(level_db=-4, closed_db=-52, jitter=0.33, rasp_db=13.5,
                         bark_hz=1046, bark_width_hz=150, bark_db=29)
    backdrop = warbler(level_db=3.5, trill_hz=149.6, waver=0.005, scatter_t60=0.16)
    backdrop += open_air(air_db=-54, wind_db=6.5, drone_hz=98.3, drone_db=-61)
    ahead = eq(pond + bank_echoes(pond + shake) + backdrop, PORT_EQ)
    return shake + ahead + far_bird(level_db=3, waver=0.0073, echo_s=0.047, echo_db=-7)


def record(dry):
    """The master: the image leans right, peaks are rounded and the top is cut at 14.9 kHz."""
    hz, lead_db = np.transpose(RIGHT_LEAD)
    left_db = -10 * np.log10((1 + from_db(lead_db) ** 2) / 2)
    pair = np.array([eq(dry[0], np.c_[hz, left_db]), eq(dry[1], np.c_[hz, left_db + lead_db])])
    rounded = np.tanh(pair)   # softens the sharpest clinks
    return signal.sosfilt(signal.ellip(10, .3, 80, 14900, fs=SR, output="sos"), rounded)


dry = scene()
out = record(dry)
wav_out(out)
```